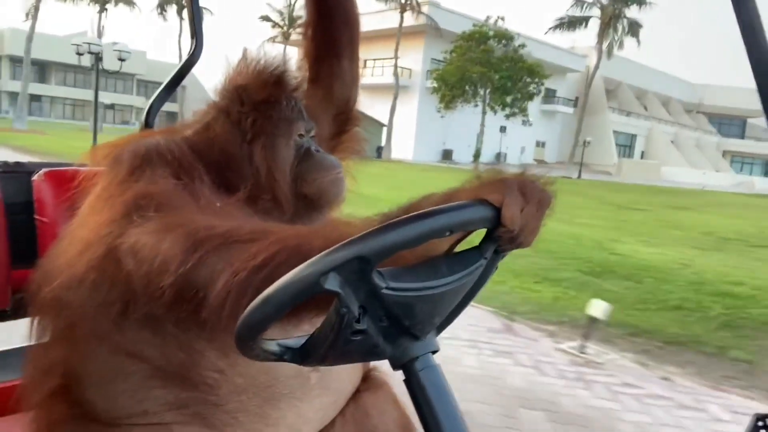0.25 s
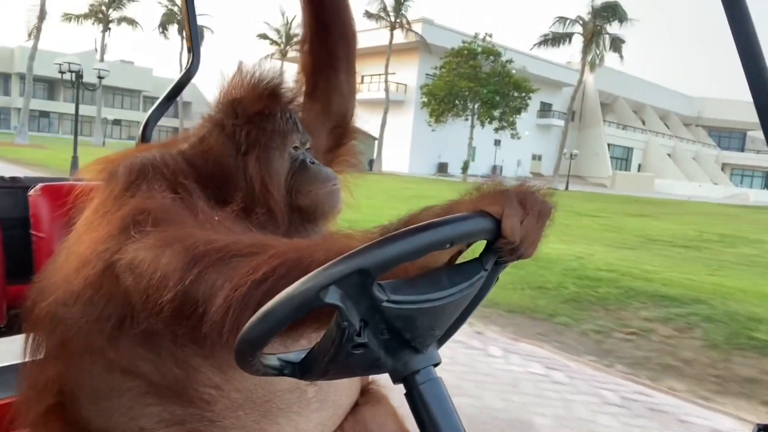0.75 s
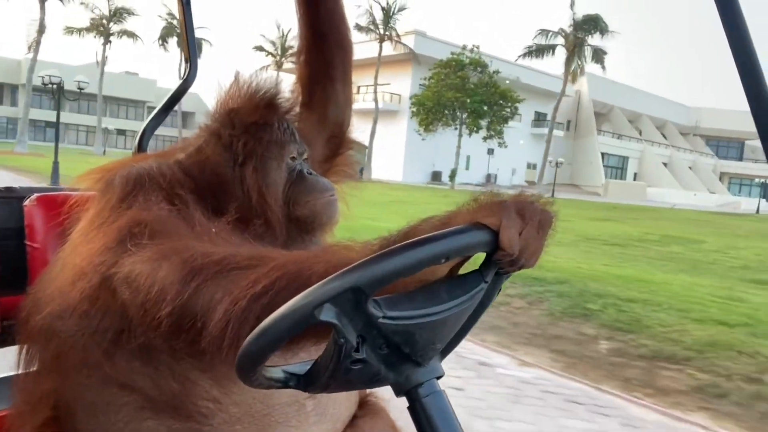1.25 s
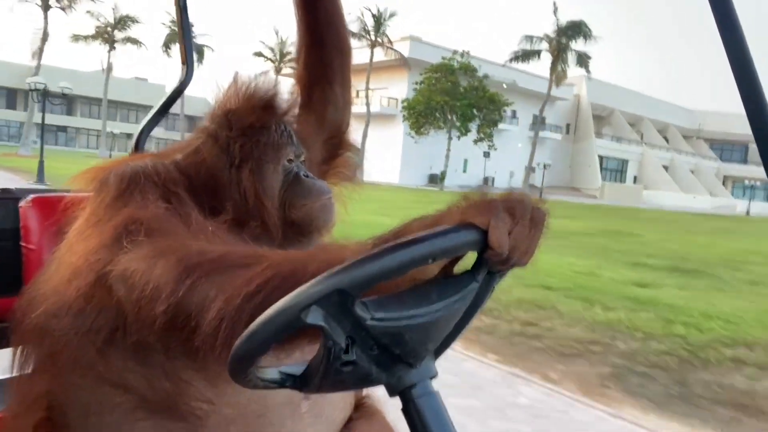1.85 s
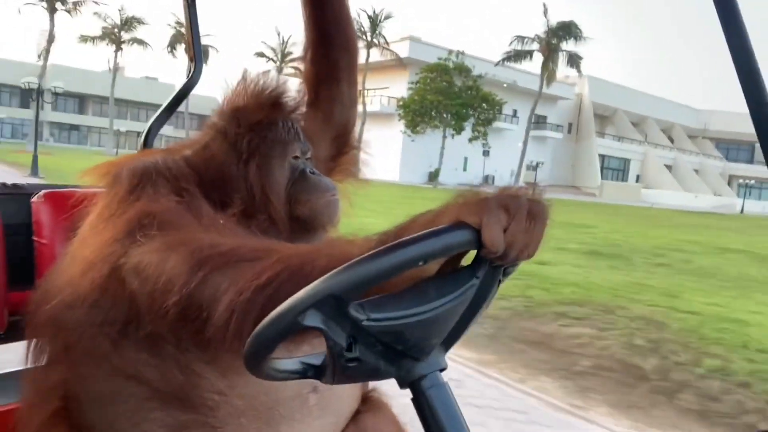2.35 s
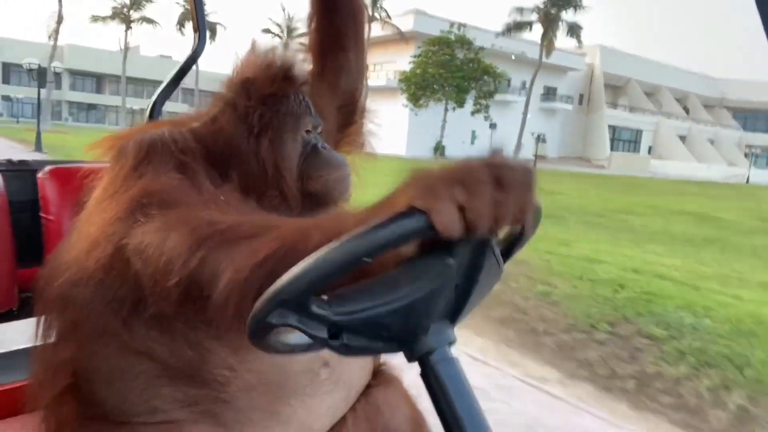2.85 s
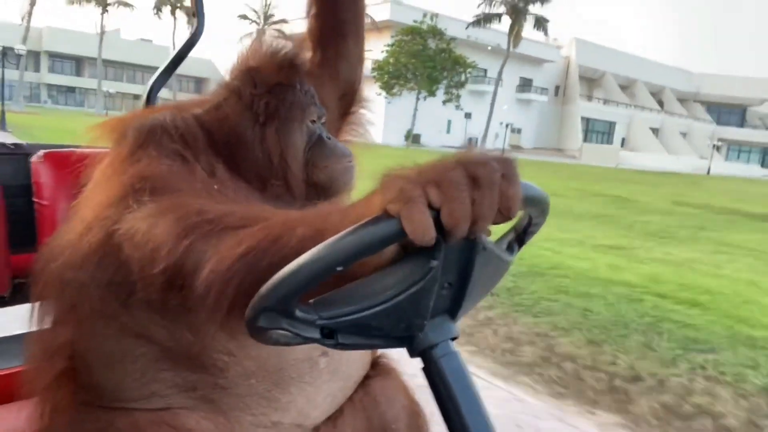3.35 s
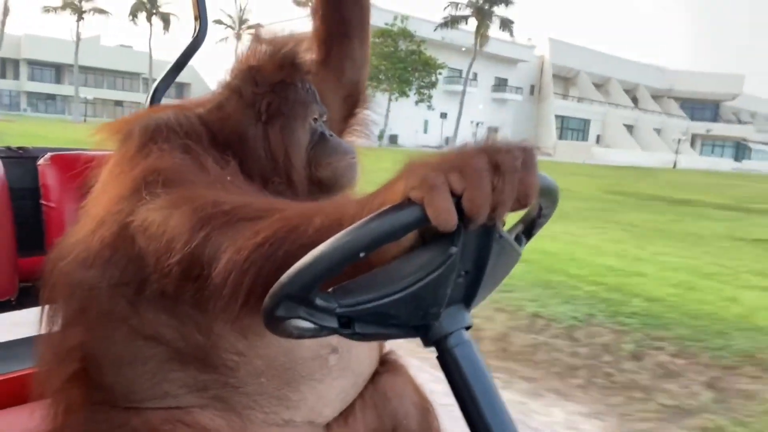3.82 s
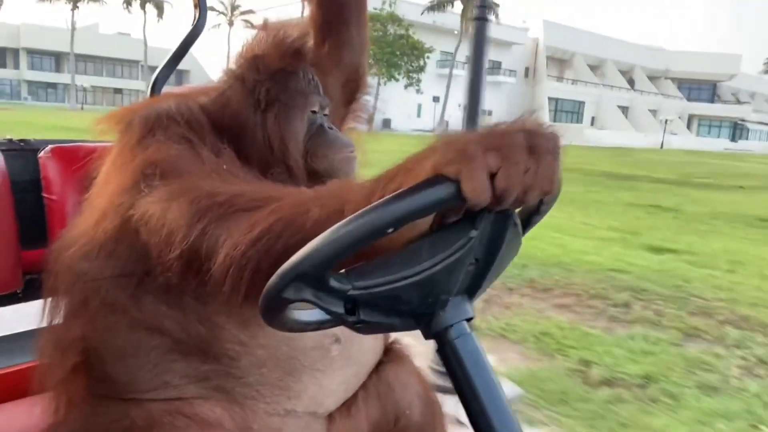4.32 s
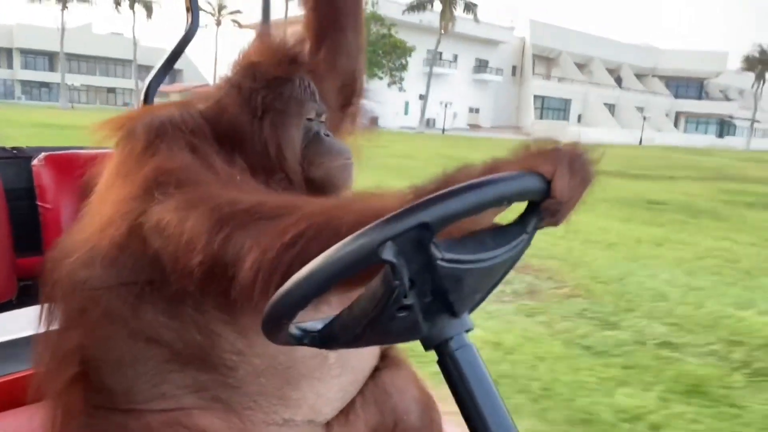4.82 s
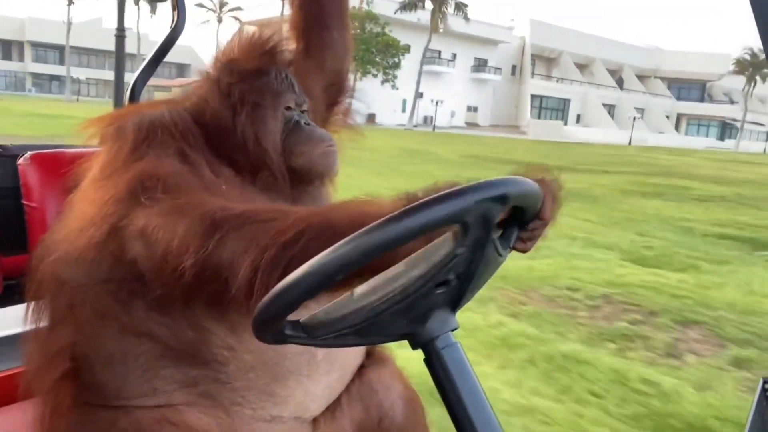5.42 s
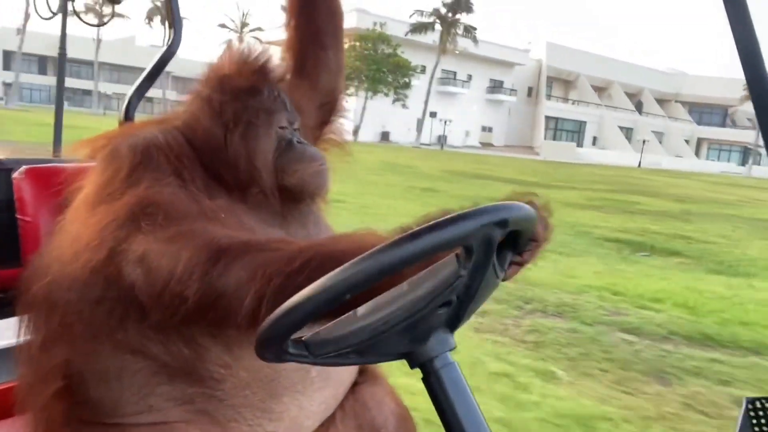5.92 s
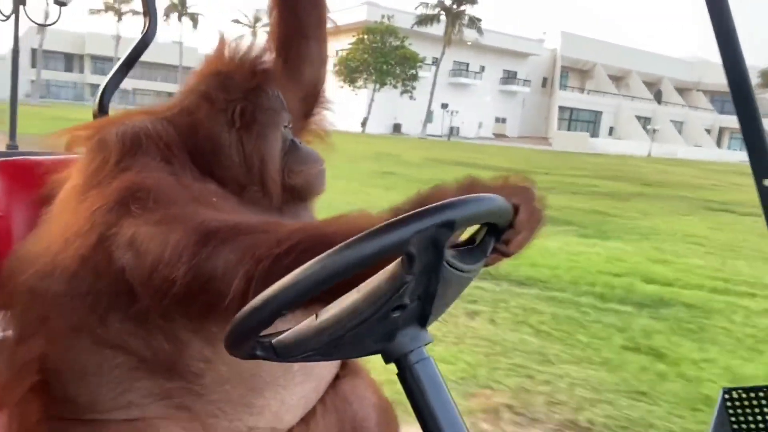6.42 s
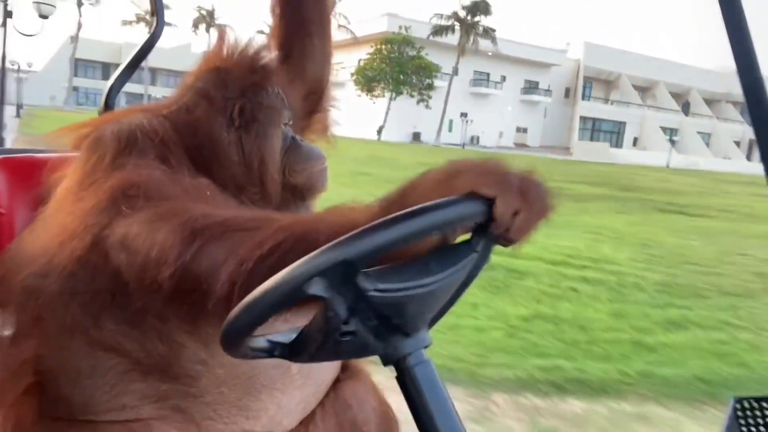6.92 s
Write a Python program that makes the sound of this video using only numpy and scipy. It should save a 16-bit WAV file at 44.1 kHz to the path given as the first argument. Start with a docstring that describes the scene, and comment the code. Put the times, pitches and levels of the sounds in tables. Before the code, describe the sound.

A small electric cart rolls steadily over rough paving, heard from the seat near its loose parts. Low chassis boom and hum swell and dip beneath gritty tyre noise leaning left. Plastic panels tap and knock constantly; the frame gives tiny dry squeaks, more often in the second half. Sharp clacks and rattles follow strong bumps around four seconds, the heaviest near 4.6, then sand ticks and a quick side rub before it rolls on.

```python
"""On board a golf cart on a brick path, heard in stereo from the seat, close to all its parts. The chassis
rumbles and booms as shaped noise and a wavering tone; the drive hums with the speed. Paver joints tap and knock
the plastic body about twenty times a second, ringing its damped modes. Tyres roar and crunch over grit as noise
and tiny rings; jolts rattle and clack loose fittings. The frame squeaks and panels scrape by stick-slip;
something rubs along the side; faint notes peep and whistle."""
import sys
import numpy as np
from scipy import signal
from scipy.fft import rfft, irfft, next_fast_len
from scipy.io import wavfile
from scipy.ndimage import uniform_filter1d, map_coordinates

SR = 44100
rng = np.random.default_rng(int(sys.argv[2]) if len(sys.argv) > 2 else 0)


def unload_audio(sound):
    """Save the sound as a 16-bit wav file, at the path given as the first command line argument."""
    columns = np.transpose(np.atleast_2d(sound))
    # keep every value between -1 and 1, then stretch to whole-number steps
    steps = np.round(np.clip(columns, -1, 1) * 32767)
    wavfile.write(sys.argv[1], SR, steps.astype(np.int16))


N = 316197

# Tables. Levels of events and courses are before the trims; mode and spectrum levels are relative.
# Faint, very high peeps: (time [s], level [dB], pitch [Hz])
PEEPS = [(0.31, -60, 6330), (0.33, -56, 7540), (0.52, -55, 7670), (0.81, -55, 7700), (1.505, -59, 6200),
         (1.825, -60, 6850), (1.954, -57, 6850), (2.265, -54, 6700), (2.805, -52, 7450),
         (3.13, -48.5, 6400), (3.72, -52, 6300), (6.84, -54, 7600)]
# Thin, faint whistles: (time [s], level [dB], start pitch [Hz], end pitch [Hz], length [s])
WHISTLES = [(5.437, -49.5, 2306, 2260, 0.094), (5.644, -50.5, 2066, 2320, 0.096)]

# Course of the rubbing along the side: (time [s], level [dB])
RUB_LEVEL = [(6.08, -76), (6.13, -77), (6.18, -48), (6.215, -53), (6.245, -44.5), (6.3, -47), (6.34, -65),
             (6.4, -87)]
# Colour of the rubbing: (frequency [Hz], level per Hz [dB])
RUB_SPECTRUM = [(800, -27), (1950, -16), (2250, -10), (2500, 9), (2700, -4), (3000, 11.5), (3400, 0),
                (4050, -4), (4500, 3.5), (5000, -11), (5600, -14), (7100, -5), (9000, -22), (16000, -19)]

# Loose sand under the tread: (time of the middle [s], level [dB], length [s])
SAND_PATCHES = [(2.406, -65, 0.029), (2.476, -51.5, 0.1), (2.815, -54, 0.045), (3.08, -57, 0.093),
                (3.234, -57, 0.039), (3.664, -55.5, 0.11), (3.82, -46, 0.026), (3.942, -49, 0.16),
                (4.074, -51, 0.059), (4.163, -58, 0.055), (4.677, -65, 0.101), (5.447, -53.5, 0.028),
                (5.532, -56, 0.042), (6.022, -53, 0.03), (6.244, -43, 0.029), (6.514, -54.5, 0.062),
                (6.645, -52, 0.046), (7.1, -60, 0.11), (6.888, -52, 0.043)]
# Grit flicked against the body: (time [s], level [dB])
GRIT_TICKS = [(0.276, -52), (1.591, -45.5), (2.172, -47), (2.766, -48), (4.056, -35), (4.092, -43),
              (4.165, -45), (4.487, -49), (4.581, -35), (4.651, -42), (4.714, -43), (4.901, -50),
              (5.001, -51), (5.442, -45), (5.512, -38), (5.556, -48), (5.868, -45), (6.242, -37),
              (6.355, -46), (6.638, -40), (6.803, -48), (7.139, -42)]
# Colour of sand under the tread, then of sand thrown up: (frequency [Hz], level per Hz [dB])
CRUNCH_SPECTRUM = [(2000, -27), (5000, -1), (7000, 6), (8300, 1.5), (10000, -6), (12000, -2), (14000, -13),
                   (16000, -4)]
SPRAY_SPECTRUM = [(2000, -22), (5000, 5), (7000, 3), (8400, 5), (9500, 0.5), (10200, 0.5), (12000, 0.5),
                  (14000, -6), (16000, -6)]
# Left-right likeness of the same two: (frequency [Hz], correlation [-1 to 1])
CRUNCH_ALIKE = [(2000, .3), (7000, 1), (15000, 0.94)]
SPRAY_ALIKE = [(2000, .1), (7000, 0.36), (15000, 0.63)]

# Tyre roar, how rough the path is; also drives hiss, sand and small taps: (time [s], level [dB])
ROAD_LEVEL = [(0, -39), (1.1, -40.5), (2.7, -38), (3.8, -37.5), (4.07, -34), (4.3, -38), (4.75, -35),
              (5.05, -37.5), (5.4, -36.5), (6.7, -36), (7.17, -37)]
# Colour of the tyre roar, then of the tyre hiss: (frequency [Hz], level per Hz [dB])
ROAR_SPECTRUM = [(90, -12), (150, 4), (240, 3), (330, -5), (400, -2), (480, -7), (620, -4.5), (820, -12),
                 (1000, -9), (1300, -19.5), (1900, -21), (2600, -24.5), (5000, -75), (16000, -80)]
HISS_SPECTRUM = [(1000, -12), (2300, 10), (3000, 3), (4000, 5.5), (5200, -2.5), (7400, -6), (9500, -20),
                 (16000, -21)]
# How far the hiss reaches the left microphone first: (frequency [Hz], phase lead [rad])
HISS_LEAD = [(1000, -7), (1700, 2.5), (2400, 2), (3100, 4), (4200, 4.5), (5500, 6)]
# Left-right likeness of the hiss, then of other wide noise: (frequency [Hz], correlation [-1 to 1])
HISS_ALIKE = [(1000, 1), (3000, 0.25), (7500, 0.23)]
NOISE_ALIKE = [(60, 0.67), (120, 0.71), (240, 0.71), (480, 0.26), (950, 0.018), (1890, -0.46),
               (3770, -0.43), (7520, 0.63), (15000, 0.29)]

# Panels scraping on each other: (time [s], level [dB], resonance [Hz], length [s])
SCRAPES = [(0.21, -48.5, 3300, 0.046), (1.043, -47, 3180, 0.013), (1.186, -41.5, 2560, .03),
           (2.18, -42.5, 1850, .026), (2.321, -36.5, 1970, 0.022), (2.333, -32, 1810, 0.014),
           (2.359, -40, 1690, 0.033), (2.395, -43, 4080, 0.028), (3.078, -43.5, 1700, 0.032),
           (3.79, -41, 2320, 0.021), (3.89, -41, 1700, 0.027), (4.124, -36.5, 2000, 0.012),
           (4.612, -39, 1780, 0.027), (4.652, -36, 1480, .028), (6.126, -38, 1780, 0.016),
           (6.195, -40.5, 1940, .07), (6.689, -40, 3630, .02), (6.729, -36, 1740, 0.015),
           (6.886, -37, 3000, 0.016)]
# Sharp plastic snaps among the panels: (time [s], level [dB], t60 [s])
PANEL_SNAPS = [(1.2015, -34, .012), (1.2235, -38, .012), (1.2385, -43, 0.013), (1.257, -44, .014),
               (1.306, -41, 0.023), (2.341, -28, 0.021), (4.061, -30.5, 0.025), (5.515, -39, 0.024),
               (5.886, -39, .025)]
# Colour of the snaps and of the squeaks' rasp: (frequency [Hz], level per Hz [dB])
SCRAPE_SPECTRUM = [(500, -29), (1100, 7), (1550, 2), (1900, 8), (2500, -4), (3300, -12), (4500, -13.5),
                   (7000, -33), (16000, -64)]
# Frame squeaks: (time [s], peak level [dB], pitch [Hz], length [s], overtone level [dB])
SQUEAKS = [(0.618, -42.5, 1286, 0.026, -22), (1.311, -39, 1325, 0.014, -26),
           (1.951, -40.5, 1340, 0.02, -17), (2.181, -40.5, 1760, 0.015, -10), (2.458, -35, 1300, 0.03, -16),
           (2.559, -41.5, 1340, 0.02, -22), (2.983, -28, 1303, 0.011, -26), (3.138, -32, 1318, 0.024, -21),
           (3.417, -33, 1335, 0.023, -20), (3.651, -36.5, 1303, 0.023, -15.5),
           (3.971, -40.5, 1270, 0.022, -3), (3.992, -27.5, 1284, 0.013, -27),
           (4.047, -19.5, 1394, 0.0085, -36), (4.554, -22.5, 1380, 0.0088, -39),
           (4.611, -31, 1950, 0.0076, -23), (4.822, -35.5, 1924, 0.01, -26),
           (5.221, -28.5, 1927, 0.009, -20), (5.238, -37, 1238, 0.028, -14), (5.293, -38, 1342, 0.017, -23),
           (5.527, -37, 1280, .015, -17), (5.828, -35.5, 1286, 0.018, -17),
           (5.999, -34.5, 1320, 0.029, -13), (6.128, -31.5, 1650, 0.0083, -22),
           (6.655, -40, 1327, 0.014, -15), (6.859, -37, 1295, 0.028, -21), (6.955, -38, 1776, 0.018, -22)]
# Decay of the tail under the roof: (frequency [Hz], t60 [s])
CANOPY_DECAY = [(300, 0.11), (1500, 0.091), (5000, 0.044), (15000, 0.036)]

# Loose parts rattling after a jolt: (time [s], level [dB], t60 [s], brightness [dB per octave])
RATTLES = [(1.245, -38.5, 0.085, -1), (3.07, -40.5, 0.65, -7), (3.99, -31, 0.086, -9),
           (4.049, -29.5, 0.59, -5), (4.555, -36, 0.4, -3), (4.65, -37.5, 0.44, 1.5),
           (5.492, -44, 0.034, -11), (6.007, -39, 0.16, 2)]
# Colour of the dry clatter: (frequency [Hz], level per Hz [dB])
CLATTER_SPECTRUM = [(150, -43), (450, 10), (700, 18), (1000, -1.5), (1500, 7), (2000, 1), (2800, -1.5),
                    (4000, -7), (5500, -8.5), (7500, -10), (10000, -28), (16000, -40)]
# Hard single blows of loose fittings: (time [s], peak level [dB], pitch of the struck part [Hz])
CLACKS = [(1.2385, -23, 1250), (1.2514, -34, 1100), (1.2577, -25, 950), (1.3044, -23, 600),
          (4.062, -18, 750), (4.073, -35, 650), (4.089, -25, 600), (4.098, -25, 650), (4.146, -31, 490),
          (4.166, -19, 520), (4.569, -23, 1100), (4.582, -22, 3200), (5.411, -26, 900), (5.435, -24, 520),
          (5.492, -20.5, 830), (6.513, -27, 800), (6.640, -31, 700), (6.654, -27, 700), (6.695, -31, 800)]
# Modes of the loose fittings: (frequency [Hz], level [dB], free t60 [s])
FITTING_MODES = [(492, 4, 0.034), (682, -2, 0.019), (839, -0.5, 0.059), (1156, 3.5, 0.034),
                 (1327, 0, 0.058), (1591, 0, 0.043), (1833, -4.5, 0.062), (2016, -2, 0.025),
                 (2480, -6, 0.027), (2960, -5, 0.027), (3350, -6.5, 0.03), (4200, -17, .01)]

# Hardest knocks of the paver joints on the body: (time [s], peak level [dB], crack level [dB])
KNOCKS = [(0.021, -23, -44), (0.076, -25, -42), (0.127, -24, -44), (0.175, -24, -46), (0.286, -28.5, -43),
          (0.336, -25.5, -43), (0.467, -35, -46), (0.740, -22.5, -44), (0.793, -29, -54), (0.889, -27, -52),
          (0.942, -27, -56), (0.989, -26.5, -58), (1.044, -27.5, -45), (1.237, -33, -40),
          (1.252, -22.5, -49), (1.305, -21.5, -41), (1.355, -24, -59), (1.579, -25, -48), (1.646, -29, -44),
          (1.691, -30, -44), (1.792, -24.5, -42), (2.004, -26.5, -41), (2.060, -26, -44), (2.110, -29, -47),
          (2.385, -33, -47), (2.435, -26, -46), (2.493, -28, -35), (2.533, -27, -43), (2.601, -27, -49),
          (2.868, -21, -48), (2.942, -22.5, -51), (3.007, -24, -55), (3.094, -27.5, -38), (3.191, -21, -49),
          (3.243, -20, -38.5), (3.386, -25.5, -43), (3.456, -23, -48), (3.582, -22.5, -54),
          (3.712, -24, -43), (3.801, -28, -54), (3.872, -20.5, -43), (3.928, -26, -50), (3.966, -17.5, -43),
          (3.997, -31, -37), (4.059, -18.5, -41), (4.07, -19, -48), (4.086, -17.5, -41), (4.142, -23, -44),
          (4.161, -22, -38), (4.235, -32, -42), (4.459, -23, -54), (4.569, -19, -49), (4.614, -22, -44),
          (4.676, -29, -38), (4.751, -33, -43), (4.795, -27.5, -43), (5.223, -28.5, -50),
          (5.410, -22, -41.5), (5.435, -23, -44), (5.493, -23, -55), (5.512, -22.5, -46), (5.566, -28, -61),
          (5.689, -28, -42), (5.785, -31, -57), (5.886, -28, -58), (5.922, -26.5, -41), (5.997, -23.5, -43),
          (6.072, -24, -44), (6.123, -29, -46), (6.253, -21, -41), (6.286, -21.5, -40), (6.395, -23, -55),
          (6.463, -18.5, -40), (6.512, -23, -36), (6.568, -24.5, -40), (6.639, -19.5, -37.5),
          (6.654, -24.5, -43), (6.694, -25, -50), (6.734, -26, -49), (6.789, -26, -45), (6.834, -27, -49),
          (6.897, -26, -34), (6.956, -23.5, -45), (7.089, -33, -49)]
# Hard landings of the suspension: (time [s], level [dB], crack level [dB])
BUMPS = [(4.582, -12.5, -36.5)]
# Modes of the plastic body, the floor pan and the springs: (frequency [Hz], level [dB], t60 [s])
PANEL_MODES = [(370, -6.5, 0.031), (479, 4.5, 0.042), (544, 3, 0.032), (755, -12.5, 0.038),
               (822, -11.5, 0.068), (1190, -18.5, 0.027), (1630, -12, 0.029), (1940, -16, 0.036)]
FLOORPAN_MODES = [(149.5, 9.5, 0.11), (234.7, 8, 0.16), (320, 0, 0.015)]
SPRING_MODES = [(140, -5.5, 0.37), (238, -7, .2), (267, -5, 0.13), (324, 0.5, 0.061), (520, 4, 0.029),
                (1064, -5, .03)]
# Colour of the crack of a knock: (frequency [Hz], level per Hz [dB])
CRACK_SPECTRUM = [(200, -23), (450, -2), (750, 0), (1100, 11), (1450, -4.5), (1900, 10), (2500, -2),
                  (4000, -4), (5500, -12), (8000, -16), (11000, -36), (16000, -48)]

# Drive hum, rising with the speed: (time [s], pitch [Hz])
HUM_PITCH = [(0, 114.3), (.6, 115), (1.1, 118.8), (1.6, 121.9), (2.4, 121.9), (3.1, 120.4), (3.7, 121),
             (4.3, 118.8), (4.9, 128.2), (5.5, 134.3), (6.1, 135.3), (6.6, 127), (7.17, 122.4)]
# Drive hum, swelling and dipping as it beats with the rumble: (time [s], level [dB])
HUM_LEVEL = [(0.0, -36), (.17, -28), (.68, -32.5), (1.02, -31), (1.18, -31.5), (1.3, -42), (1.58, -29.5),
             (1.72, -40), (1.92, -25), (2.04, -54), (2.16, -33.5), (2.55, -30), (2.72, -36.5), (3.1, -33),
             (3.2, -38), (3.7, -36), (4.3, -35), (4.5, -38.5), (4.8, -31.5), (5.2, -41.5), (5.64, -32),
             (5.8, -45), (5.98, -33.5), (6.24, -50), (6.7, -40), (6.84, -31.5), (7.16, -53)]
# The frame's lowest strong mode booming: (time [s], level [dB])
BOOM_LEVEL = [(0, -32.5), (.15, -34), (.4, -39), (.8, -42), (.9, -23), (1.02, -30), (1.12, -45), (1.4, -46),
              (1.58, -32), (1.68, -40), (1.85, -34), (2.1, -45), (2.35, -32), (2.5, -48), (2.75, -36),
              (3.05, -37), (3.7, -39), (3.92, -30), (4.2, -44), (4.33, -42), (4.42, -26.5), (4.56, -34.5),
              (4.66, -47), (4.98, -39), (5.1, -27), (5.28, -38.5), (6.88, -38), (6.98, -26), (7.1, -47)]
# Chassis shaking: (time [s], level [dB])
RUMBLE_LEVEL = [(0.0, -33), (0.64, -36), (0.76, -31), (0.98, -31.5), (1.12, -34.5), (1.5, -34), (1.7, -30),
                (2, -31.5), (2.62, -37.5), (2.74, -30.5), (3.1, -36.5), (3.24, -31), (3.4, -33),
                (4.05, -31.5), (4.42, -33.5), (4.75, -30), (5.1, -32), (5.5, -30), (5.62, -32),
                (5.8, -28.5), (6.28, -29.5), (6.4, -34), (6.66, -24.5), (6.9, -31.5), (7.04, -28.5),
                (7.16, -32.5)]
# Colour of the shaking: (frequency [Hz], level per Hz [dB])
CHASSIS_SPECTRUM = [(15, -34), (28, -19), (33, -9), (39, -13.5), (46, 3), (56, -2.5), (68, -1.5), (77, -6),
                    (86, -1), (108, -3.5), (140, -10.5), (180, -29), (300, -36), (600, -120)]
# Side of the chassis and drive: (time [s], left minus right [dB])
CHASSIS_LEAN = [(0, 3), (2, 4.5), (5.6, 3), (6.2, 3), (6.7, -0.5), (7.17, 6.5)]

# Settings
TOP_HZ = 15850  # band limit of the microphones
PEEP_DB, PEEP_S = 1.5, 0.0184  # trim and length of a peep
WHISTLE_WAVER = .009  # relative unsteadiness of pitch
STROKE_START_S, STROKE_S = 6.135, .0309  # first catch of the rubbing; time from one to the next
STROKE_HZ, STROKE_DB = 3950, -44.5  # chirp of a catch: mean pitch, level on the third stroke
RETURN_HZ, RETURN_DB = 2980, -50  # lower chirp of a return: mean pitch, level on the third stroke
STROKE_SWELL_DB = 0.5  # chirps gain this from one stroke to the next
SAND_DB, SAND_FOLLOWS = -61.5, 0.58  # crunch on an average stretch before trim; dB per dB of roar
TICK_DB, TICK_T60_S = -3, 0.037  # trim and decay of a flicked grain
GRAVEL_DB, GRAVEL_FOLLOWS = -49.5, 1.85  # taps on an average stretch; dB per dB of roar
HISS_DB, HISS_FOLLOWS = -58.5, 0.33  # hiss on an average stretch; dB per dB of roar
TYRE_LEAN_DB = 3  # left minus right
SCRAPE_DB, SCRAPE_WIDTH, SLIPS_PER_S = -3, 0.22, 900  # trim; bandwidth over pitch; mean slip rate
SQUEAK_DB = -0.5  # trim of all squeaks
SLIP_ROUGH_DB, SLIP_JITTER = 3.5, .032  # flutter of level and relative jitter of pitch in a chirp
RASP_DB, RASP_T60_S = -24, 0.073  # grinding with a squeak: level against it, and decay
CLACK_DB, CLACK_DAMPING = -5, 0.73  # trim; share of free decay kept while in contact
CLACK_FALL_DB = 12  # per octave away from the struck part
KNOCK_DB, THUD_DB, CRACK_DB = -0.5, -11.5, 3.5  # trims: panel ring, floor pan thud, crack
KNOCK_LEAN_DB, KNOCK_WANDER_DB = -1, 3  # left minus right of the knocks, and its scatter
CRACK_T60_S = .028
BOOM_HZ, BOOM_WAVER = 76.8, 0.0362  # pitch and its relative wander


def amp(db):
    """Decibels to gain."""
    return 10 ** (np.asarray(db) / 20)


def unit(x):
    """Scale to rms 1."""
    return x / np.sqrt(np.mean(x ** 2) + 1e-20)


def along(points, hz):
    """(frequency [Hz], value) points read on a log axis."""
    f, v = np.transpose(points)
    return np.interp(np.log(hz + 1), np.log(f + 1), v)


def curve(rows):
    """(time [s], value) points as one value per sample."""
    s, value = np.transpose(rows)
    return np.interp(np.arange(N) / SR, s, value)


def wobble(rate):
    """A smooth random curve, rate knots a second."""
    knots = rng.standard_normal(int(N * rate / SR) + 4)
    return map_coordinates(knots, [np.arange(N) * rate / SR])


def filtered(x, response):
    """x times a response of frequency."""
    m = next_fast_len(N + SR // 2)
    return irfft(rfft(x, m) * response(np.fft.rfftfreq(m, 1 / SR)), m)[..., :N]


def panned(lean_db):
    """Left and right gains for a level difference."""
    return amp(np.array([[.5], [-.5]]) * lean_db)


def add(track, s, sound):
    """Mix a sound into a track at time s."""
    start = max(round(s * SR), 0)
    part = track[..., start:start + sound.shape[-1]]
    part += sound[..., :part.shape[-1]]


def rush(spectrum, grain=1, alike=NOISE_ALIKE):
    """Coloured stereo noise whose centre has rms 1; grain shapes it before the colouring."""
    def mid_and_side(hz):
        angle = np.arccos(np.clip(along(alike, hz), -1, 1)) / 2
        return amp(along(spectrum, hz)) * [np.cos(angle), np.sin(angle)]

    white = grain * rng.standard_normal((2, N))
    mid, side = filtered(white, mid_and_side)
    return np.array([mid + side, mid - side]) / np.std(mid)


def ring(modes, scatter_db, detune, bright_db=0, attack_s=0.002):
    """One blow on a set of modes, peak 1; each contact point weights and shifts them anew."""
    t = np.arange(SR // 5) / SR
    hz, db, t60 = np.transpose(modes)[..., None]
    gain, shift, side = rng.standard_normal((3, len(modes), 1))
    level = db + scatter_db * gain + bright_db * np.log2(hz / hz[0])
    tones = np.sin(2 * np.pi * hz * (1 + detune * shift) * t)
    wave = np.sum(np.sign(side) * amp(level - 60 * t / t60) * tones, axis=0)
    wave *= 1 - np.exp(-t / attack_s)
    return wave / np.abs(wave).max()


def bursts(rows, attack):
    """Envelope of (time [s], level [dB], t60 [s]) bursts."""
    envelope, t = np.zeros(N), np.arange(SR // 2) / SR
    for s, db, t60 in rows:
        add(envelope, s, amp(db - 60 * t / t60) * (1 - np.exp(-t / attack)))
    return envelope


def patter(rate, spread_db):
    """Small collisions at random moments and of random sizes, one stream for each side."""
    hits = rng.random((2, N)) < rate / SR
    sizes = amp(spread_db * np.clip(rng.standard_normal((2, N)), -2, 2))
    return hits * sizes * rng.choice([-1, 1], (2, N))


def chatter(rate, spread_db, bright_db):
    """The fittings rung by dense collisions at four contact points, rms 1; the sides partly mix."""
    rings = [ring(FITTING_MODES, scatter_db=2, detune=.03, bright_db=bright_db) for point in range(4)]
    struck = np.zeros((2, N))
    for body in rings:
        hits = patter(rate / len(rings), spread_db)
        struck += signal.fftconvolve(hits, body[None], axes=1)[:, :N]
    return unit(struck + 0.26 * struck[::-1])


def grains(count, hz, octaves, cycles, spread_db, size):
    """Tiny damped rings scattered in time, pitch, strength and side; rms 1."""
    pitch, strength, lean = rng.standard_normal((count, 3)).T[..., None]
    f = np.minimum(hz * 2 ** (octaves * pitch), TOP_HZ)
    turns = f * np.arange(size) / SR
    gain = amp(spread_db * np.clip(strength, -2, 2)) * np.sqrt(hz / f)
    wave = gain * np.exp(-turns / cycles) * np.sin(2 * np.pi * turns)
    at = rng.integers(0, N, (count, 1)) + np.arange(size)
    sides = []
    for side in (1, -1):
        heard = wave * amp(side * 2 * lean)
        sides.append(np.bincount(at.ravel(), heard.ravel(), N + size)[:N])
    return unit(np.array(sides))


def roughness():
    """How much rougher than average the path is, in dB."""
    roar_db = curve(ROAD_LEVEL)
    return roar_db - roar_db.mean()


def slip(hz, length, overtones_db):
    """One stick-slip chirp: an unsteady, slightly rising note that swells, flutters and fades."""
    t = np.arange(SR // 8) / SR
    # 500 random knots a second
    waver, flutter = [np.interp(t * 500, np.arange(64), knots) for knots in rng.standard_normal((2, 64))]
    u = t / max(0.41 * length, .002)
    pitch = hz * (1 + SLIP_JITTER * waver + 0.018 * np.tanh(u - 1))
    phase = 2 * np.pi * np.cumsum(pitch) / SR
    swell = (u * np.exp(1 - u)) ** 1.5
    overtones = np.sin(2 * phase) + np.sin(3 * phase)
    return swell * amp(SLIP_ROUGH_DB * flutter) * (np.sin(phase) + amp(overtones_db) * overtones)


def peeps():
    """Tiny high notes come and go above the rolling noise."""
    out = np.zeros(N)
    for s, db, hz in PEEPS:
        add(out, s, amp(db + PEEP_DB) * slip(hz, PEEP_S, overtones_db=-120))
    return out


def whistles():
    """A thin note fades in, glides in pitch and fades out."""
    out = np.zeros(N)
    for s, db, start_hz, end_hz, length in WHISTLES:
        u = np.linspace(0, 1, round(length * SR))
        glide = start_hz + (end_hz - start_hz) * u
        hz = glide * (1 + WHISTLE_WAVER * wobble(113)[:len(u)])
        fade = np.sqrt(np.abs(np.sin(np.pi * u)))
        add(out, s, amp(db) * fade * np.sin(2 * np.pi * np.cumsum(hz) / SR))
    return out * panned(2.5)


def brush():
    """Something light rubs to and fro along the side, chirping high on each stroke, lower on the return."""
    t = np.arange(N) / SR
    strokes = 1 + .5 * np.cos(2 * np.pi * (t - STROKE_START_S) / STROKE_S)
    out = amp(curve(RUB_LEVEL) - 3) * strokes * rush(RUB_SPECTRUM, amp(1.9 * wobble(300)))
    for k in range(6):
        s, swell_db = STROKE_START_S + k * STROKE_S, STROKE_SWELL_DB * (k - 2)
        high, low = 1 + 0.021 * rng.standard_normal(2)
        catch = slip(STROKE_HZ * high, length=0.015, overtones_db=-24)
        add(out, s, amp(STROKE_DB + swell_db) * catch)
        back = slip(RETURN_HZ * low, length=0.0078, overtones_db=-10)
        add(out, s + STROKE_S / 2, amp(RETURN_DB + swell_db) * back)
    return out * panned(4.1)


def grit():
    """Sand crunches under the tread and sprays from loose patches; single grains flick the body."""
    t = np.arange(N) / SR
    bed = amp(SAND_DB + SAND_FOLLOWS * roughness() + 1.7 * wobble(10))
    spray = np.zeros(N)
    for s, db, length in SAND_PATCHES:
        spray += amp(db) * np.exp(-(2 * (t - s) / length) ** 2)
    clumps = amp(0.66 * wobble(760) + 3.4 * wobble(60))
    under_tread = bed * rush(CRUNCH_SPECTRUM, clumps, CRUNCH_ALIKE)
    thrown_up = spray * rush(SPRAY_SPECTRUM, clumps, SPRAY_ALIKE)
    crunch = amp(-2.5) * (under_tread + thrown_up)
    sand = grains(count=1500, hz=8500, octaves=.35, cycles=3, spread_db=3.5, size=200)
    ticks = bursts([(s, db + TICK_DB, TICK_T60_S) for s, db in GRIT_TICKS], attack=0.00014)
    flicks = ticks * rush(CRUNCH_SPECTRUM, alike=SPRAY_ALIKE)
    return crunch + amp(-14.5) * (bed + spray) * sand + flicks


def gravel():
    """Small stones under the tread tap the body in a dense, uneven crackle of damped rings."""
    taps = grains(count=700, hz=950, octaves=.45, cycles=2.2, spread_db=2.5, size=700)
    return amp(GRAVEL_DB + GRAVEL_FOLLOWS * roughness()) * taps


def tyres():
    """Rolling roar and hiss flutter with the uneven bricks; small knocks and the fittings patter along."""
    roar_db = curve(ROAD_LEVEL)
    uneven = wobble(35)
    roar = amp(roar_db - 1.14 + 1.12 * uneven) * rush(ROAR_SPECTRUM, amp(1.26 * wobble(160)))
    hiss_gain = amp(HISS_DB + HISS_FOLLOWS * roughness() + 2.6 * uneven)
    hiss = hiss_gain * rush(HISS_SPECTRUM, amp(1.1 * wobble(500)), HISS_ALIKE)
    # the hiss comes from one side and reaches the right microphone late
    hiss = filtered(hiss, lambda hz: np.exp(-1j * along(HISS_LEAD, hz) * np.array([[0], [1]])))
    pats = grains(count=1300, hz=1006.4, octaves=0.712, cycles=9.6, spread_db=2.5, size=1200)
    small_knocks = amp(roar_db - 10.5 + uneven) * pats
    fittings = amp(roar_db - 11.0) * chatter(rate=130, spread_db=2.5, bright_db=-1)
    return roar + hiss + small_knocks + fittings


def scrapes():
    """Plastic panels grind: runs of tiny slips ring one resonance; sharp snaps sound at their own moments."""
    rasp, t = np.zeros(N), np.arange(SR // 5) / SR
    for s, db, hz, length in SCRAPES:
        slips = (rng.random(len(t)) < SLIPS_PER_S / SR) * rng.choice([-1, 1], len(t))
        rubbing = slips + 0.15 * rng.standard_normal(len(t))
        rung = signal.lfilter(*signal.iirpeak(hz, 1 / SCRAPE_WIDTH, SR), rubbing)
        rung = signal.lfilter(*signal.iirpeak(hz, .7, SR), rung)
        u = t / (0.38 * length)
        swell = (u * np.exp(1 - u)) ** 2
        add(rasp, s, amp(db + SCRAPE_DB) * swell * unit(rung))
    snaps = bursts(PANEL_SNAPS, attack=0.0003) * rush(SCRAPE_SPECTRUM)
    return (rasp + snaps) * panned(2.8)


def squeaks():
    """A flexing frame joint slips for a moment and sings one rough note over a short rasp."""
    notes = np.zeros(N)
    for s, db, hz, length, overtones_db in SQUEAKS:
        add(notes, s, amp(db + SQUEAK_DB) * slip(hz, length, overtones_db))
    grinding = bursts([(s, db + RASP_DB, RASP_T60_S) for s, db, *_ in SQUEAKS], attack=0.0074)
    rasp = grinding * rush(SCRAPE_SPECTRUM, amp(11.0 * wobble(400)))
    return (notes + rasp) * panned(2.7)


def canopy(x):
    """The roof and body scatter a short tail, different on each side and 5 ms late."""
    hz, t, z = signal.stft(rng.standard_normal((2, SR // 6)), SR, nperseg=128)
    decay = amp(-60 * t / along(CANOPY_DECAY, hz)[:, None])
    tail = signal.istft(z * decay, SR, nperseg=128)[1]
    tail = np.pad(tail / np.linalg.norm(tail[0]), ((0, 0), (SR // 200, 0)))
    return signal.fftconvolve(x, tail, axes=1)[:, :N]


def rattles():
    """After each jolt the loose fittings collide in a dense run that dies away, under a dry clatter."""
    out = np.zeros((2, N))
    t = np.arange(SR // 4) / SR
    for s, db, t60, bright_db in RATTLES:
        hits = (rng.random((2, len(t))) < 700 / SR) * rng.choice([-1, 1], (2, len(t)))
        body = ring(FITTING_MODES, scatter_db=1.5, detune=0.012, bright_db=bright_db)
        # each side also hears half of the other's collisions
        blows = (hits + .5 * hits[::-1]) * amp(-60 * t / t60)
        run = signal.fftconvolve(blows, body[None], axes=1)
        # levelled on its first 25 ms
        add(out, s, amp(db - 3) * run / (np.std(run[:, :SR // 40]) + 1e-9))
    dying = bursts([(s, db - 2, t60) for s, db, t60, bright_db in RATTLES], attack=0.0022)
    clatter = dying * rush(CLATTER_SPECTRUM, amp(4.2 * wobble(220)))
    return (out + clatter) * panned(2.8)


def clacks():
    """On hard jolts one fitting strikes sharply; its neighbours ring less, and contact damps them all."""
    out = np.zeros((2, N))
    for s, db, part_hz in CLACKS:
        modes = []
        for hz, level, t60 in FITTING_MODES:
            fall_db = CLACK_FALL_DB * abs(np.log2(hz / part_hz))
            modes.append((hz, level - fall_db, t60 * CLACK_DAMPING))
        shared, left, right = [ring(modes, scatter_db=2, detune=.06, attack_s=.0004) for part in range(3)]
        add(out, s, amp(db + CLACK_DB) * (shared + 0.29 * np.array([left, right])))
    return out * panned(2.5)


def joints():
    """Wheels crossing paver joints tap the panel modes, about once for every six cycles of the hum."""
    travelled = np.cumsum(curve(HUM_PITCH) / 6) / SR  # in pavers
    crossings = np.flatnonzero(np.diff(np.floor(travelled)))
    roar_db = curve(ROAD_LEVEL)
    taps = np.zeros((2, N))
    for i, (late, size, lean) in zip(crossings, rng.standard_normal((len(crossings), 3))):
        tap = ring(PANEL_MODES, scatter_db=4, detune=.04)
        gain = amp(roar_db[i] - 4.5 + 2 * size) * panned(3 * lean)
        add(taps, i / SR + 0.00309 * late, gain * tap)
    return taps


def knocks():
    """The hardest joint knocks ring the body panel and floor pan, with a short crack; a bump bottoms the
    springs."""
    body = np.zeros((2, N))
    for s, db, crack_db in KNOCKS:
        # each microphone also hears its own nearby part of the panel
        shared = ring(PANEL_MODES, scatter_db=3, detune=.025)
        near = np.array([ring(PANEL_MODES, scatter_db=4, detune=.08) for side in range(2)])
        place = panned(KNOCK_LEAN_DB + KNOCK_WANDER_DB * rng.standard_normal())
        add(body, s, amp(db + KNOCK_DB) * place * (0.69 * shared + 0.22 * near))
        thud = ring(FLOORPAN_MODES, scatter_db=4, detune=.08)
        add(body, s, amp(db + THUD_DB) * thud)
    for s, db, crack_db in BUMPS:
        add(body, s, amp(db) * panned(6.5) * ring(SPRING_MODES, scatter_db=1.5, detune=0.0085))
    crack_rows = [(s, crack_db + CRACK_DB, CRACK_T60_S) for s, db, crack_db in KNOCKS]
    cracks = bursts(crack_rows, attack=0.0015) * rush(CRACK_SPECTRUM)
    bump_rows = [(s, crack_db, .035) for s, db, crack_db in BUMPS]
    bump_cracks = bursts(bump_rows, attack=0.0004) * rush(HISS_SPECTRUM)
    return body + cracks + bump_cracks


def drive_hum():
    """The drive sings one sine that follows the speed, with an unsteady pitch and level."""
    pitch = curve(HUM_PITCH) * (1 + .018 * wobble(14))
    phase = 2 * np.pi * np.cumsum(pitch) / SR
    flutter = unit(amp(2.2 * wobble(20)))
    return amp(curve(HUM_LEVEL) - 1) * flutter * unit(np.sin(phase))


def frame_boom():
    """The frame's lowest strong mode booms as one sine of wavering pitch and level."""
    phase = 2 * np.pi * np.cumsum(BOOM_HZ * (1 + BOOM_WAVER * wobble(9))) / SR
    return amp(curve(BOOM_LEVEL) + 2.0 * wobble(11.0)) * unit(np.sin(phase))


def chassis_rumble():
    """The road shakes the frame's low resonances: coloured noise whose strength the road sets."""
    shake = rush(CHASSIS_SPECTRUM)
    # level the noise over a sixth of a second, so that the table alone sets its slow course
    swell = np.sqrt(np.abs(uniform_filter1d(np.mean(shake ** 2, axis=0), SR // 6)) + 1e-6)
    return amp(curve(RUMBLE_LEVEL) + 1.5) * shake / swell


def scene():
    """Rolling noise leans mostly left; squeaks, scrapes and faint notes echo briefly under the roof."""
    creaks = peeps() + whistles() + scrapes() + squeaks()
    echoed = amp(-2.8) * creaks + amp(-4.0) * canopy(creaks)
    ground = grit() + (gravel() + tyres()) * panned(TYRE_LEAN_DB)
    loose_parts = brush() + rattles() + clacks()
    body = joints() + knocks()
    cart = (drive_hum() + frame_boom() + chassis_rumble()) * panned(curve(CHASSIS_LEAN))
    return echoed + ground + loose_parts + body + cart


def record(dry):
    """The microphones keep nothing above their band limit."""
    return filtered(dry, lambda hz: hz < TOP_HZ)


dry = scene()
out = record(dry)
unload_audio(out)
```